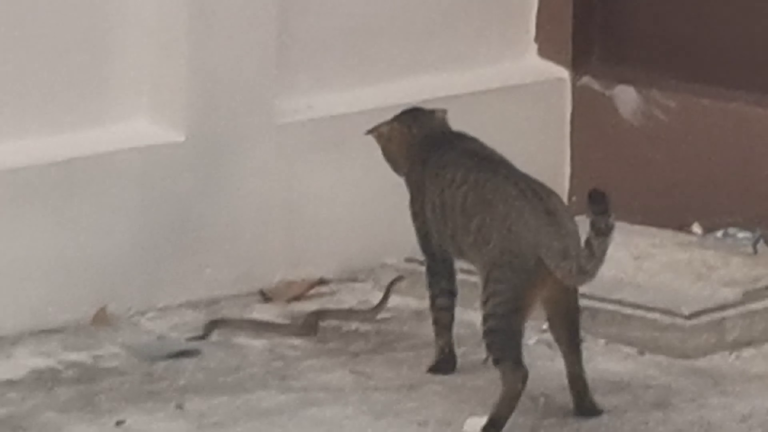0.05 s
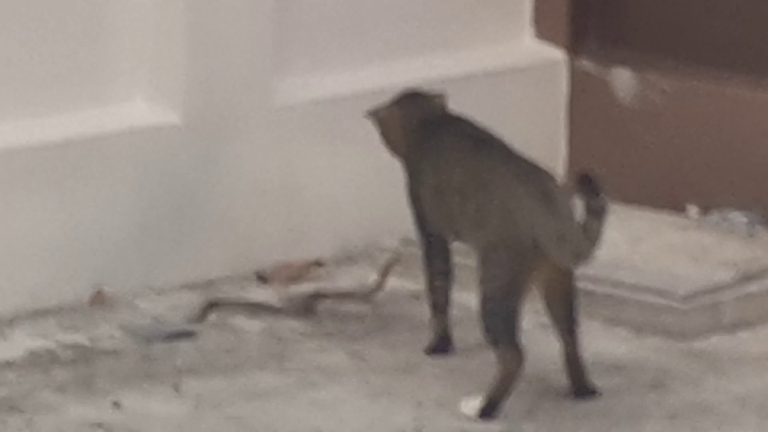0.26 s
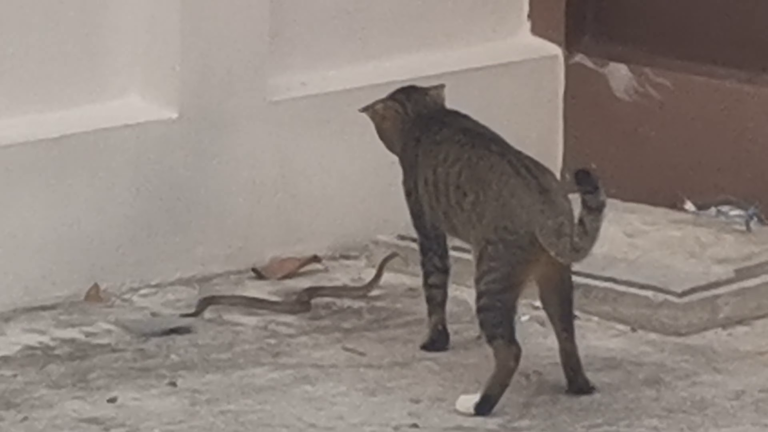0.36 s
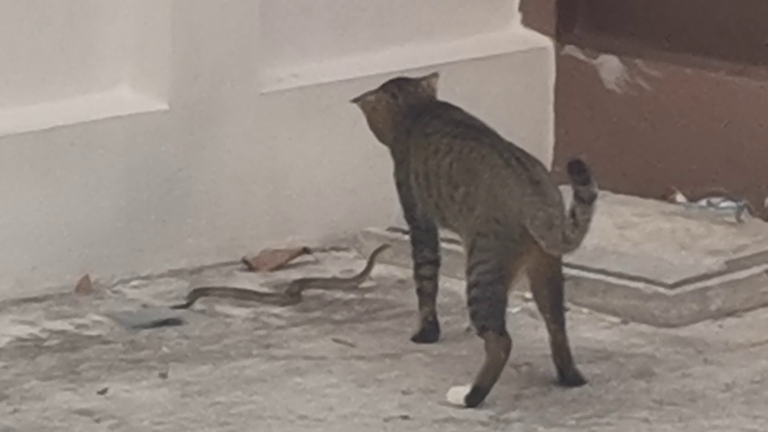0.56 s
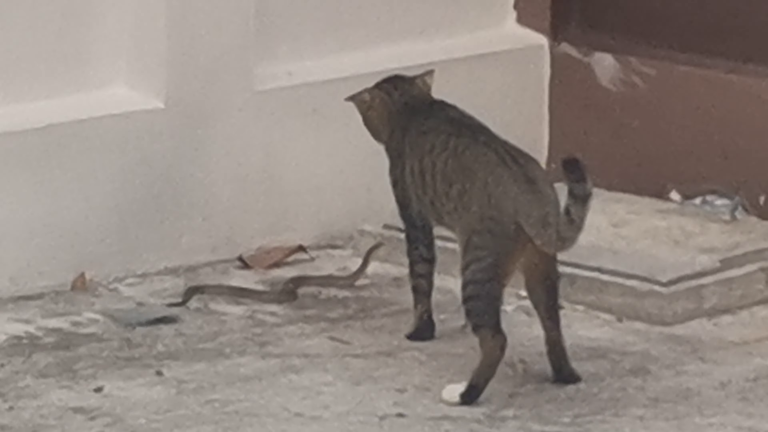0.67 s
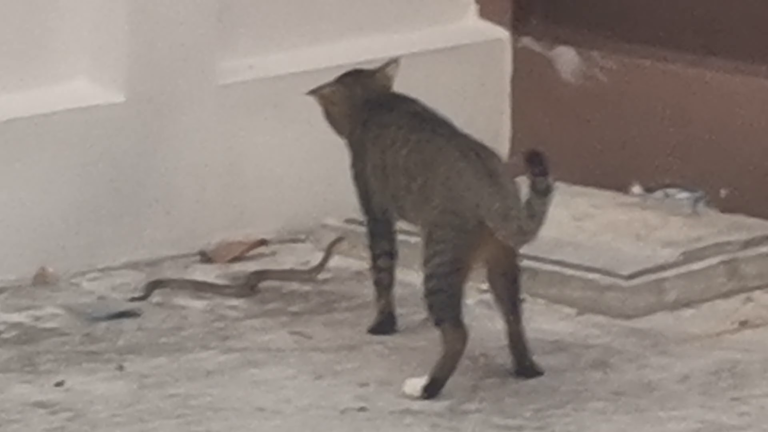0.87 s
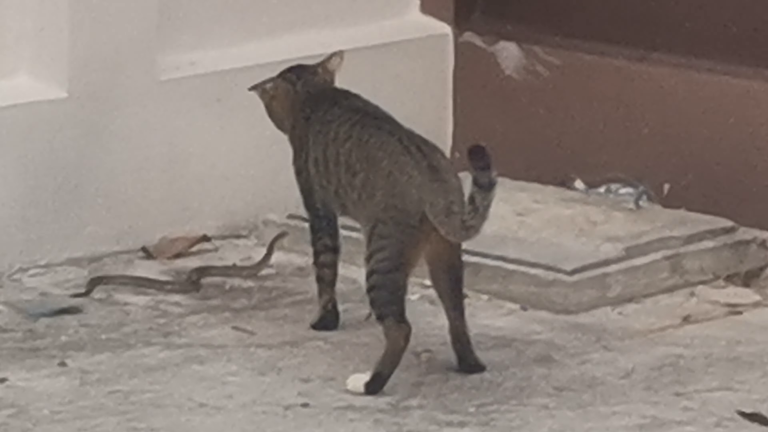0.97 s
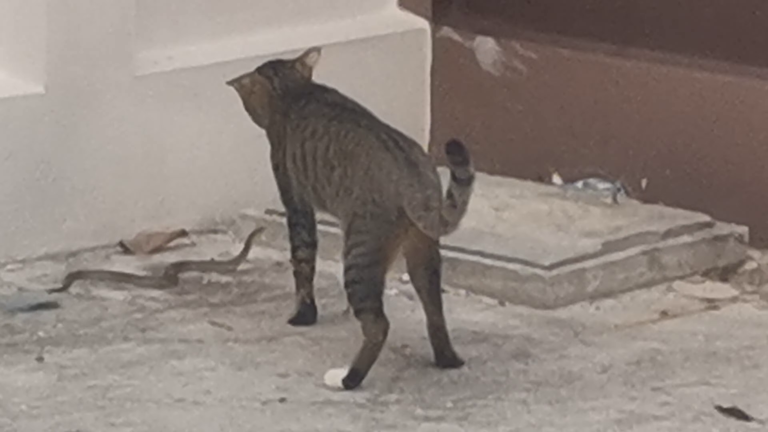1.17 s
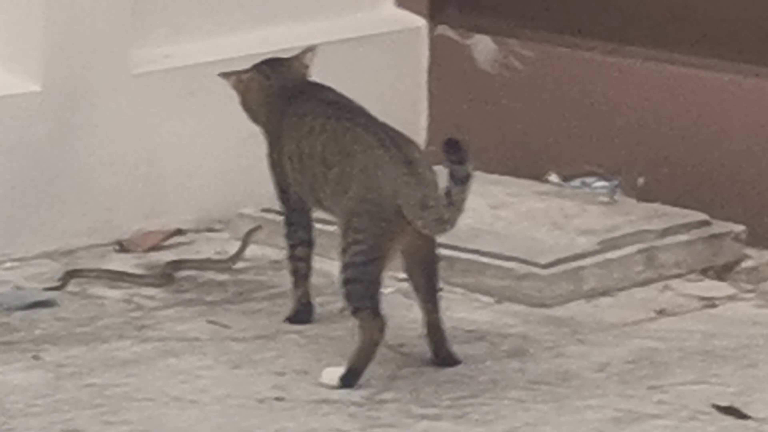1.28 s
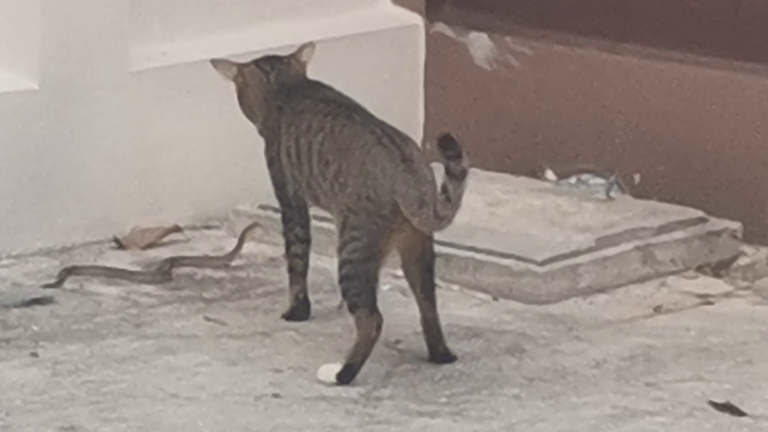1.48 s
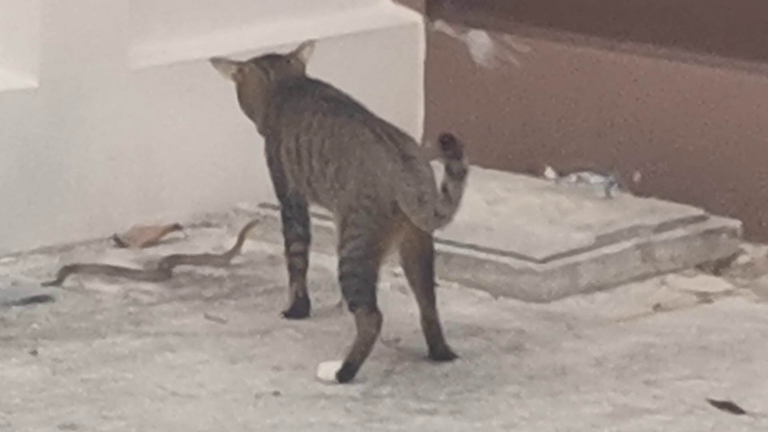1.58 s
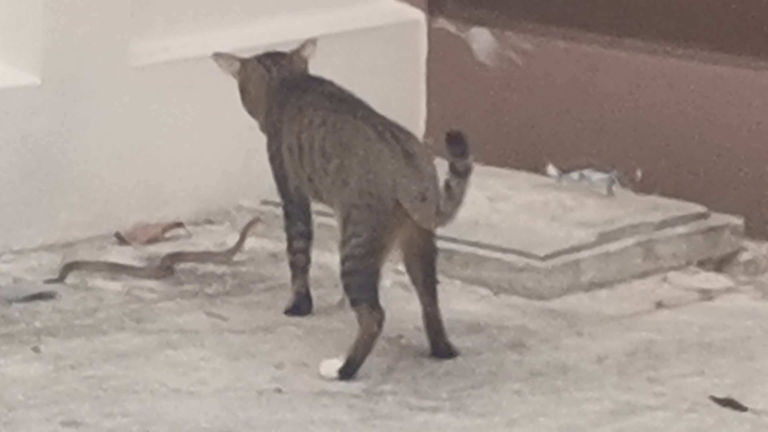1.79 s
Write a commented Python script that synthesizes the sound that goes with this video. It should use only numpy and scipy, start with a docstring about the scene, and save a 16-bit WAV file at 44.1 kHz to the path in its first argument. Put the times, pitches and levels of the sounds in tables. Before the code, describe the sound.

A cat some way off gives a few thin whoops at about 0.5 seconds, then a long moan from 0.6 that sinks into a throbbing growl and ends near 1.5, echoing off house walls. Wind buffets the microphone from 0.2 to 1.2 seconds, mostly on the left. A hand bumps it twice around 1.2. Behind are a faint opening rustle, distant birds, an insect trill and steady outdoor noise.

```python
"""First come faint bird chirps and a rustle, over steady outdoor noise and a thin insect trill.
Wind starts to buffet the microphone, mostly on the left. An animal some way off gives a few thin
whoops, then one long moan: pulses from its throat ring in its mouth, and the ring sinks as the voice
breaks into a throbbing growl. House walls smear the calls. A hand bumps the recorder twice."""
import sys
import numpy as np
from scipy import signal
from scipy.fft import rfft, irfft
from scipy.io import wavfile
from scipy.ndimage import uniform_filter1d

SR = 44100
rng = np.random.default_rng(int(sys.argv[2]) if len(sys.argv) > 2 else 0)


def wav_out(sig):
    """Save sig, one row per channel (or a flat mono array), as 16-bit PCM at SR to the path in sys.argv[1]."""
    wavfile.write(sys.argv[1], SR, np.round(np.clip(np.atleast_2d(sig).T, -1, 1) * 32767).astype(np.int16))


N = 81585


def gain(db):
    """Turn decibels into a number to multiply by."""
    return 10 ** (np.asarray(db) / 20)


def unit(x):
    """Scale a sound to an average power of 1."""
    return x / np.sqrt(np.mean(x ** 2))


def drift(rate):
    """A smooth random wobble of size about 1, with `rate` new values a second."""
    step = max(int(SR / rate), 1)
    points = rng.standard_normal(2048)
    path = np.interp(np.arange(N) / step, np.arange(len(points)), points)
    return 1.189 * uniform_filter1d(path, step // 2 + 1)


def colour(x, hz, db):
    """Turn each frequency up or down along a curve."""
    f = np.maximum(np.fft.rfftfreq(N, 1 / SR), 1)
    return irfft(rfft(x) * gain(np.interp(np.log(f), np.log(hz), db)), N)


def pan(db):
    """Make the left side `db` louder than the right."""
    return gain(np.array([[db], [-db]]) / 2)


def wall_echoes(x, fade_s=0.74, build_s=0.027, shared=0.24):
    """Many echoes off house walls blur together, partly different on each side."""
    t = np.arange(N) / SR
    tail = shared * rng.standard_normal(N) + (1 - shared) * rng.standard_normal((2, N))
    tail *= gain(-60 * t / fade_s) * (1 - np.exp(-t / build_s))
    tail /= np.sqrt(np.sum(tail ** 2, axis=1, keepdims=True))
    return signal.fftconvolve(np.atleast_2d(x), tail, axes=1)[:, :N]


def from_afar(t, call, echo_db, pan_db, lag_s):
    """A call reaches the right side a little late, and the walls add echoes."""
    direct = np.array([call, np.interp(t - lag_s, t, call)])
    return pan(pan_db) * (direct + gain(echo_db) * wall_echoes(call))


def whistle(t, start, length, from_hz, to_hz, waver):
    """One note that swells, slides in pitch and fades."""
    progress = np.clip((t - start) / length, 0, 1)
    hz = (from_hz + (to_hz - from_hz) * progress ** 2.12) * (1 + waver * drift(500))
    return 2 * np.sin(np.pi * progress) * np.sin(2 * np.pi * np.cumsum(hz) / SR)


# tone of the outdoor noise (frequency [Hz], left boost [dB], right boost [dB])
OUTDOOR_TONE = [(24.5, -72, -76.5), (192, -77, -76), (324, -87.5, -83.5), (525, -89, -93.5),
                (650, -86.5, -85), (1120, -92, -87.5), (1620, -98.5, -94), (2470, -99.5, -95),
                (3400, -101, -99), (4230, -102, -97.5), (5380, -111, -106), (6500, -111, -107),
                (7100, -99, -100), (7800, -98, -101), (7680, -102, -108), (8560, -97, -110),
                (9560, -111, -118), (11400, -118, -114), (15300, -122, -120)]
# its loudness (time [s], level [dB])
OUTDOOR_LEVEL = [(0, -50.5), (.45, -53), (1.2, -50)]
def outdoors(t, hiss_lag_s=0.000415):
    """Distant noise from all around, with a low roar and a hiss that reaches the left first."""
    hz, left, right = np.array(OUTDOOR_TONE).T
    roar = gain(1.5) * colour(rng.standard_normal(N), [144, 384, 790, 1220], [-6.5, 0.5, -1.5, -28.5])
    hiss = gain(-5.5) * colour(rng.standard_normal(N), [600, 1100, 2500, 6000], [-5, 4, -0.5, -8])
    sides = roar + np.array([hiss, np.interp(t - hiss_lag_s, t, hiss)]) + rng.standard_normal((2, N))
    air = np.array([colour(side, hz, db) for side, db in zip(sides, (left, right))])
    return unit(air) * gain(np.interp(t, *np.array(OUTDOOR_LEVEL).T))


def insect(pitch_hz=7780):
    """A thin, high trill whose loudness flutters."""
    hz = pitch_hz * (1 + 0.0091 * drift(400))
    flutter = gain(-80 + 3 * drift(43))
    return pan(6.7) * flutter * np.sin(2 * np.pi * np.cumsum(hz) / SR)


def rustle(t, peak_s=0.081, width_s=0.074):
    """A faint hiss that quickly swells and fades."""
    hiss = colour(rng.standard_normal((2, N)), [1200, 2170, 3550, 8000], [-3.5, 1, -18, -43])
    return unit(hiss) * gain(-61) * np.exp(-((t - peak_s) / width_s) ** 2)


# bird notes (time [s], length [s], start pitch [Hz], end pitch [Hz], level [dB],
# left minus right [dB], rasp [share of pitch])
BIRD_NOTES = [(0.033, 0.041, 4200, 4120, -75.5, -7, 0.026), (0.043, .065, 2620, 2190, -73, -5, 0.064),
              (0.106, 0.11, 2930, 2870, -75.5, -10, 0.011), (0.448, 0.12, 2950, 2885, -76, -11, 0.018),
              (0.825, 0.082, 2910, 2880, -72, -6, 0.016), (1.062, 0.062, 4070, 4180, -71.5, -6, 0.016),
              (1.22, 0.054, 4080, 3840, -75.5, 0, 0.0106), (1.297, 0.066, 2812, 2520, -70, -13, 0.046),
              (1.655, 0.086, 2980, 2910, -67.5, -17, .038)]
def birds(t, echo_db=-7):
    """Small birds chirp far away; a fast wobble in pitch makes some notes raspy."""
    song = sum(gain(db) * pan(side) * whistle(t, *note, rasp) for *note, db, side, rasp in BIRD_NOTES)
    return song + gain(echo_db) * wall_echoes(song)


# knocks on the case (time [s], pitch [Hz], fade [s], left level [dB], right level [dB], tick [dB])
KNOCKS = [(1.118, 393, 0.0017, -48, -34, -38.5), (1.19, 113, 0.0067, -24.5, -56, -67),
          (1.2, 443, 0.0027, -57, -41, -37.5)]
# tone of the tick (frequency [Hz], boost [dB])
TICK_TONE = [(300, 11), (1500, -8), (2800, -20), (5000, -37)]
def hand_bumps(t, tick_fade_s=0.0017):
    """A hand hits the recorder: a sharp tick of contact and a dull knock that dies fast."""
    out = 0
    for start, hz, fade, left_db, right_db, tick_db in KNOCKS:
        age = np.maximum(t - start, 0)
        burst = rng.standard_normal(N) * np.exp(-age / tick_fade_s) * (t > start)
        tick = gain(tick_db) * pan(-19.5) * colour(burst, *np.array(TICK_TONE).T)
        knock = np.sin(2 * np.pi * hz * age) * np.exp(-age / fade)
        out = out + gain([[left_db], [right_db]]) * knock + tick
    return out


# gusts on each side of the microphone (time [s], level [dB])
LEFT_GUSTS = [(0, -75), (.18, -51), (.235, -34), (.295, -38), (.345, -32), (.40, -26), (.45, -32.5),
              (.56, -34), (.595, -38), (.70, -41.5), (.737, -26.5), (.80, -29), (.89, -36.5), (1.0, -45.5),
              (1.13, -48.5), (1.4, -63), (1.85, -82)]
RIGHT_GUSTS = [(0, -67), (.37, -64), (.405, -41), (0.452, -43), (.55, -43), (.62, -48.5), (.68, -49),
               (.92, -45.5), (1.0, -54.5), (1.45, -58.5), (1.85, -62)]
# tone of the wind (frequency [Hz], boost [dB])
WIND_TONE = [(15, -27), (35, -9), (55, -0.5), (95, -0.5), (140, -10.5), (200, -13.5), (280, -28.5),
             (450, -59), (1200, -84.5)]
def wind(t, deep_hz=137, bright_db=-32.5):
    """Air swirls and rumbles at each microphone opening; weak gusts sound duller than strong ones."""
    sides = []
    for gusts in (LEFT_GUSTS, RIGHT_GUSTS):
        force = gain(np.interp(t, *np.array(gusts).T))
        swirls = colour(rng.standard_normal(N), *np.array(WIND_TONE).T)
        deep = signal.sosfiltfilt(signal.butter(3, deep_hz, fs=SR, output="sos"), swirls)
        brightness = np.minimum(force / gain(bright_db), 1) ** 2
        rumble = deep + brightness * (swirls - deep)
        sides.append(force * rumble / np.sqrt(uniform_filter1d(rumble ** 2, size=2000)))
    return np.array(sides)


# the animal's whoops (time [s], length [s], start pitch [Hz], end pitch [Hz], level [dB])
WHOOP_NOTES = [(0.449, 0.037, 970, 1157, -49.5), (0.477, 0.05, 985, 965, -57),
               (0.511, 0.063, 1242, 1234, -59.5), (0.573, 0.059, 1230, 1157, -58.5)]
def whoops(t):
    """A few thin, whistle-like calls lead into the moan."""
    calls = sum(gain(db) * whistle(t, *note, waver=0.0084) for *note, db in WHOOP_NOTES)
    return from_afar(t, calls, echo_db=-0.5, pan_db=-1.5, lag_s=0.00025)


def mouth_ring(hz, ring_hz, width_hz):
    """The mouth favours frequencies near the one it rings at."""
    return (1 + ((hz - ring_hz) / width_hz) ** 2) ** -2.1


# the moan (time [s], throat pulse rate [Hz], mouth ring [Hz], ring width [Hz], growl [0-1], level [dB])
MOAN_SHAPE = [(0.596, 124.1, 1100, 171, 0.06, -60), (0.651, 121.1, 1055, 149, 0.34, -48.5),
              (0.702, 123.8, 1097, 169, 0.26, -54), (0.736, 137.8, 940, 262, 0.95, -48.5),
              (.765, 135.9, 820, 188, 0.06, -48.5), (0.797, 136.1, 824, 113, 0.13, -40),
              (.824, 136.5, 767, 121, 0.3, -43.5), (0.841, 139.4, 926, 287, 0.38, -56),
              (0.922, 133.5, 880, 257, 0.28, -52.5), (0.989, 139.3, 870, 346, 0.75, -54),
              (1.109, 146, 807, 117, 1, -48.5), (1.239, 149.7, 756, 98, 1, -43.5),
              (1.298, 146.2, 710, 101, 1, -50), (1.34, 145.5, 766, 98.1, 0.94, -47),
              (1.358, 145.7, 678, 129, 1, -56), (1.469, 135.6, 720, 148, 0.8, -55)]
# how late it reaches the right side (time [s], delay [s])
MOAN_DELAY = [(.72, 0.00032), (.78, 0.00017)]
def moan(t, fade_s=0.009):
    """Throat pulses ring in the mouth; as every second pulse drops out, the moan becomes a growl."""
    times, *columns = np.array(MOAN_SHAPE).T
    pulse_hz, mouth_hz, width_hz, growl, db = (np.interp(t, times, c) for c in columns)
    wobble = (0.0074 + 0.016 * growl) * drift(90)
    pair_hz = pulse_hz / 2 * (1 + wobble)  # pairs of pulses per second
    overtone = np.arange(4, 25)[:, None]
    hz = overtone * pair_hz
    strength = mouth_ring(hz, mouth_hz, width_hz) + gain(-21) * mouth_ring(hz, ring_hz=1150, width_hz=60)
    strength *= np.where(overtone % 2, growl, 1)  # odd overtones make the throb
    waves = np.cos(2 * np.pi * overtone * np.cumsum(pair_hz) / SR)
    voice = np.sum(strength * waves, axis=0) / np.sqrt(np.sum(strength ** 2, axis=0) / 2)
    fade = np.clip(np.minimum(t - times[0], times[-1] - t) / fade_s, 0, 1)
    lag_s = np.interp(t, *np.array(MOAN_DELAY).T)
    return from_afar(t, voice * gain(db) * fade, echo_db=0, pan_db=-2, lag_s=lag_s)


def scene():
    """Add up all the sounds, left and right."""
    t = np.arange(N) / SR
    return whoops(t) + moan(t) + birds(t) + wind(t) + hand_bumps(t) + rustle(t) + outdoors(t) + insect()


def record(dry):
    """The recorder cuts off the highest treble."""
    top_hz = 15650
    return signal.sosfilt(signal.ellip(10, .2, 80, top_hz, fs=SR, output="sos"), dry)


dry = scene()
out = record(dry)
wav_out(out)
```